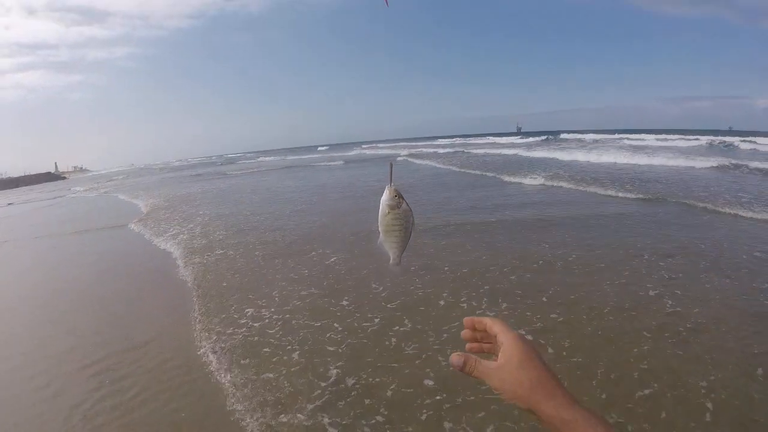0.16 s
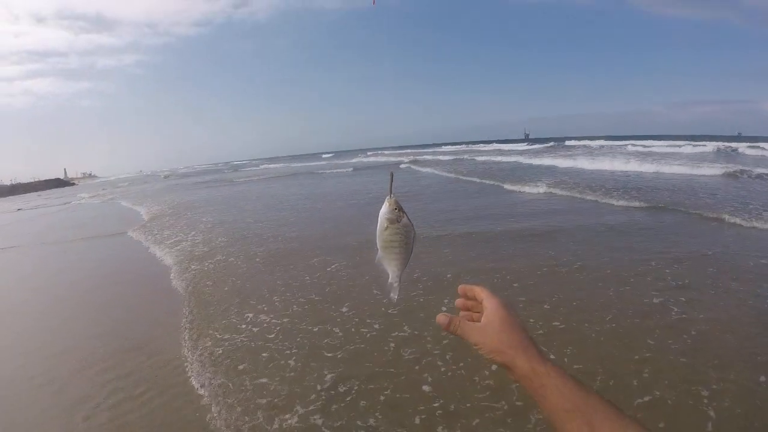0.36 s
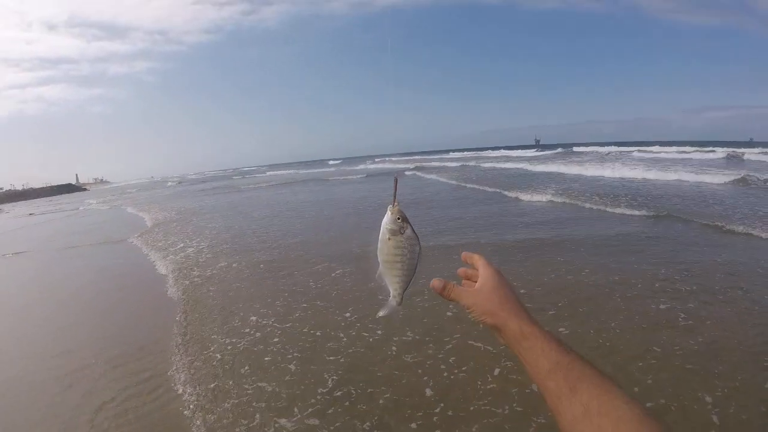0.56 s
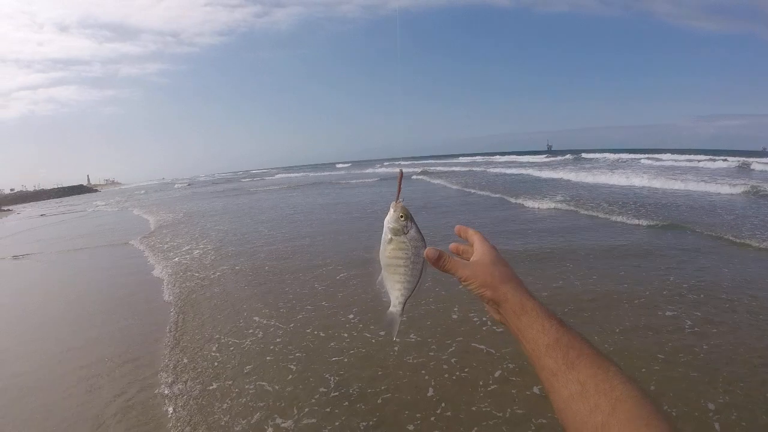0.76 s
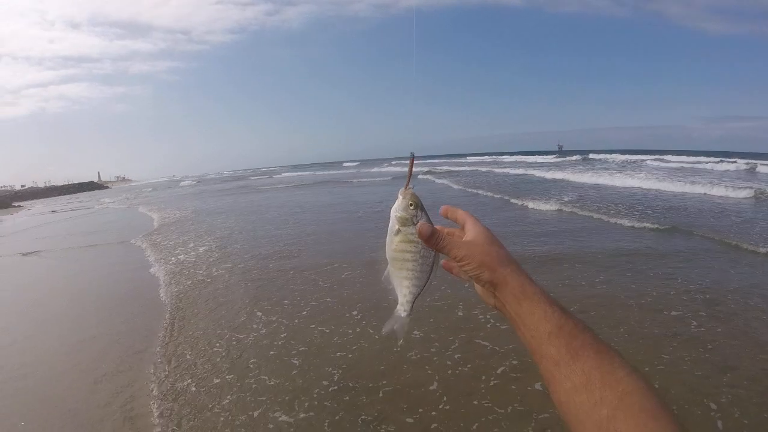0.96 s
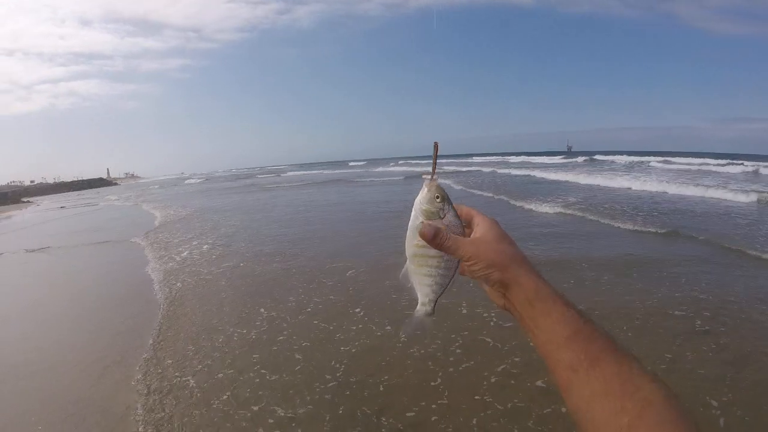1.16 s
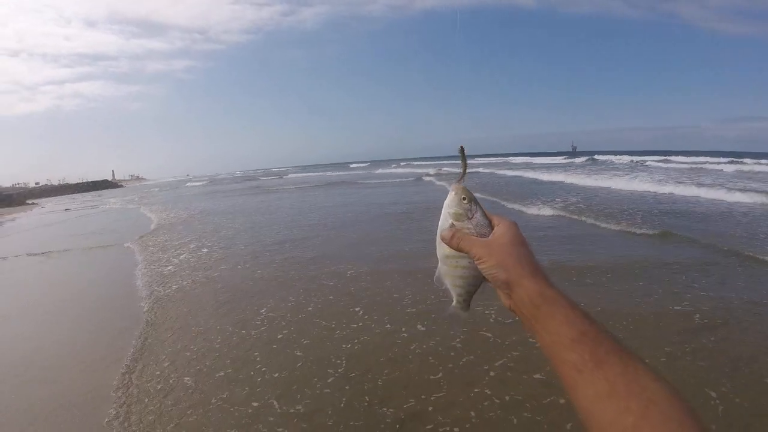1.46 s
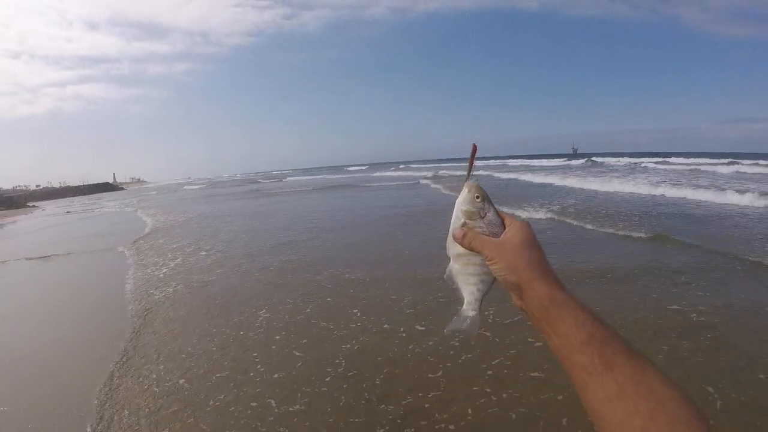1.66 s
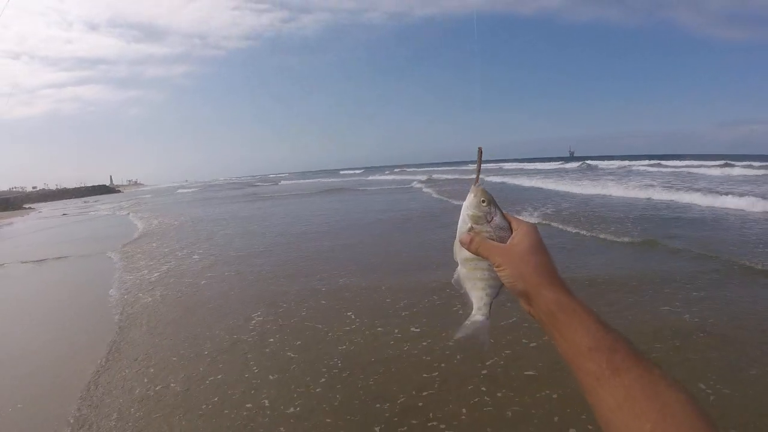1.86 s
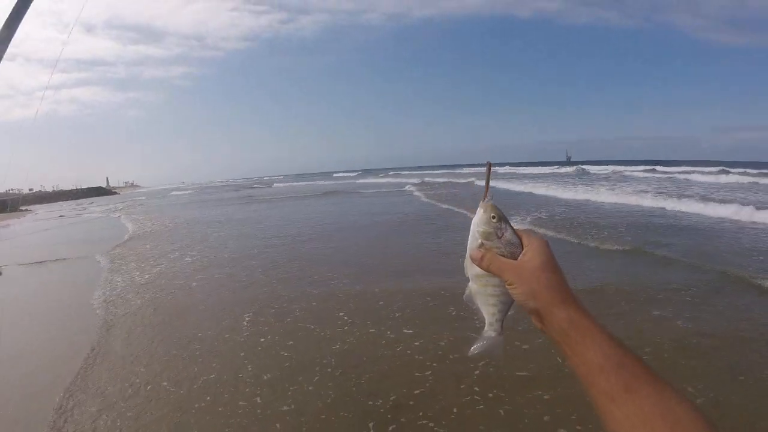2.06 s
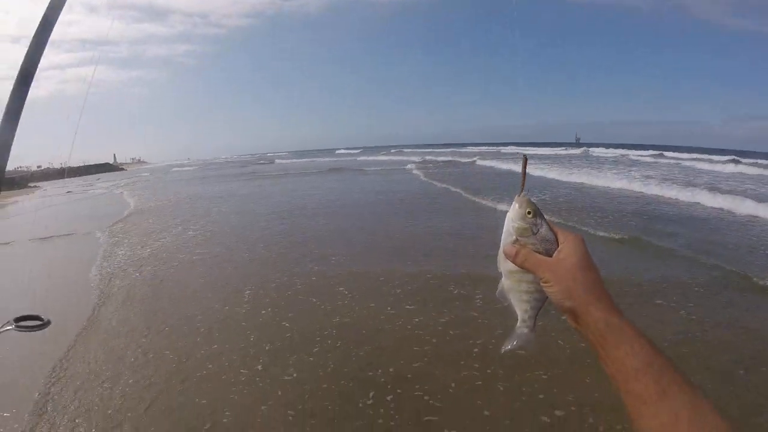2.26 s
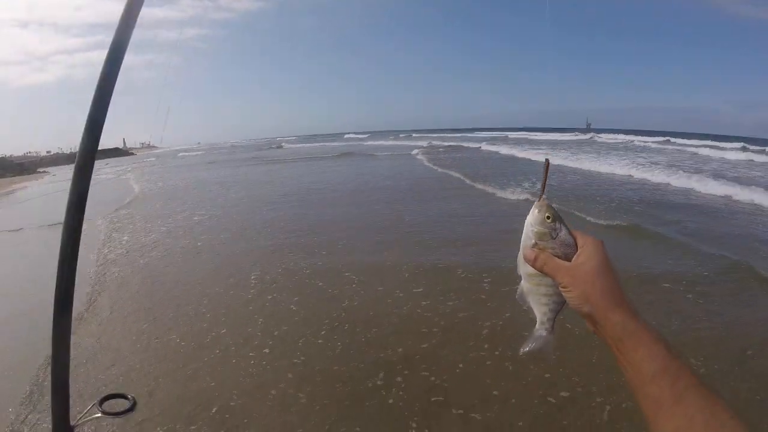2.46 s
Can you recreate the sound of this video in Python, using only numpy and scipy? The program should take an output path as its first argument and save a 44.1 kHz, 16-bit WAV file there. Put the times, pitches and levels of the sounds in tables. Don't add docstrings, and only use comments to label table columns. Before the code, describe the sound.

Strong wind buffeting and thumping on a small microphone, with surf hissing softly on a sandy beach behind

```python
import sys
import numpy as np
from scipy import signal
from scipy.fft import rfft
from scipy.io import wavfile
from scipy.ndimage import uniform_filter1d, minimum_filter1d

SR = 44100
rng = np.random.default_rng(int(sys.argv[2]) if len(sys.argv) > 2 else 0)


def rack_gain(trim_db):
    fader = np.asarray(trim_db, float)
    return 10 ** (fader / 20)


def transcribe(u):
    v = np.clip(np.atleast_2d(u).T, -1, 1)
    q = np.round(v * 32767).astype(np.int16)
    wavfile.write(sys.argv[1], SR, q)


N = 114660

# time in seconds, level in dB.
FOAM_RUSH = [
    (0, -38.5),
    (.15, -37.5),
    (.45, -35.5),
    (.8, -34),
    (1.0, -38.5),
    (1.23, -37.5),
    (1.45, -40),
    (2.2, -41),
    (2.5, -39),
    (2.6, -40.5),
]
# frequency in Hz, density in dB per Hz.
FOAM_COLOUR = [(60, -0.5), (300, -1.5), (880, -8), (2550, -16.5), (3300, -21), (6000, -28.5), (10000, -40),
               (15000, -45)]
# frequency in Hz, gain in dB.
HOUSING = [(3400, 0), (4300, -2), (5000, 4.5), (5800, 4.5), (6600, -3), (10500, 0), (11600, -13),
           (12700, -13)]
# frequency in Hz, gain in dB.
HOUSING_AIR = [(12700, 0), (13600, 4.5), (14200, -2), (15000, -6)]
# time in seconds, level in dB.
STEADY_WIND = [(0, -24), (.3, -22.5), (.75, -17.5), (.87, -27), (1.19, -20.5), (1.5, -18), (1.78, -20),
               (1.95, -16.5), (2.13, -25), (2.3, -24.5), (2.42, -20.5), (2.5, -18), (2.57, -20), (2.6, -31)]
# frequency in Hz, density in dB per Hz.
EDDY_COLOUR = [(14, -7.5), (25, 2), (60, 1), (120, -7), (250, -20.5), (500, -32.5), (1000, -49),
               (2000, -60.5)]
# centre in seconds, strength in dB, half length in seconds.
SLOW_PUFFS = [(.068, -12.5, 0.016), (.126, -9.5, .016), (.236, -14, 0.023), (.325, -13.5, .019),
              (.399, -15, 0.018), (.474, -15, 0.012), (.57, -15, 0.023), (.613, -12.5, .016),
              (.653, -18.5, 0.017), (.712, -10, .022), (.782, -7.5, 0.016), (.82, -8.5, 0.015),
              (.908, -10, 0.022), (.982, -7.5, 0.015), (1.025, -11.5, 0.021), (1.103, -14, 0.015),
              (1.15, -16, 0.021), (1.25, -12, 0.023), (1.298, -8.5, 0.023), (1.411, -9, .013),
              (1.46, -7, 0.012), (1.495, -7.5, 0.025), (1.612, -9, 0.029), (1.72, -13, 0.039),
              (1.85, -9, 0.023), (1.94, -9, 0.036), (2.095, -6.5, 0.011), (2.272, -9, 0.013),
              (2.501, -7.5, .016), (2.555, -8.5, 0.028)]
# centre in seconds, strength in dB, half length in seconds.
QUICK_BUFFETS = [(0.13, -25, 0.01), (.306, -22.5, 0.0094), (.711, -23, 0.0075), (0.768, -20.5, 0.013),
                 (.818, -13, 0.013), (.913, -13, 0.015), (.992, -11, 0.01), (1.074, -20, 0.018),
                 (1.103, -19, .008), (1.243, -16, 0.02), (1.322, -14, 0.011), (1.361, -20, 0.014),
                 (1.41, -16.5, 0.013), (1.519, -16, 0.013), (1.545, -17.5, 0.0099), (1.583, -19, 0.012),
                 (1.615, -14.5, 0.0094), (1.692, -19, 0.011), (1.718, -15.5, 0.011), (1.752, -18, 0.011),
                 (1.815, -20, 0.016), (1.886, -20, 0.017), (1.942, -16.5, 0.015), (1.992, -15, 0.012),
                 (2.035, -12.5, .01), (2.097, -17, 0.011), (2.243, -20, 0.011), (2.272, -16, 0.0083),
                 (2.468, -17.5, 0.017), (2.572, -17.5, .016)]
# centre in seconds, level in dB, frequency in Hz.
PRESSURE_EDGES = [(.126, -22, 600), (.589, -23, 650), (.745, -23, 600), (.918, -25, 600), (.993, -18, 600),
                  (1.263, -26, 600), (1.299, -25, 600), (1.402, -21, 650), (1.419, -23, 650),
                  (1.516, -22, 800), (1.603, -18, 806), (1.665, -24, 700), (1.732, -17.5, 845),
                  (1.925, -23, 600), (1.94, -18.5, 1010), (1.989, -22, 700), (2.015, -23, 800),
                  (2.036, -27, 700), (2.473, -25, 700), (2.573, -22, 700)]
# start in seconds, level in dB, frequency in Hz, 60 dB decay time in seconds.
DROPLET = [
    (.482, -42, 10200, .008),
    (.482, -52, 13200, .006),
]


def curve(table):
    return np.interp(np.arange(N) / SR, *np.array(table).T)


def colour(table, hz):
    table_hz, db = np.array(table).T
    return np.interp(np.log(hz), np.log(table_hz), db)


def walk(rate):
    hold = int(SR / rate)
    steps = np.repeat(rng.standard_normal(N // hold + 1), hold)
    return 1.3 * uniform_filter1d(uniform_filter1d(steps, hold), hold)[:N]


def bands(shade, low_hz, count):
    f = np.maximum(np.fft.rfftfreq(N, 1 / SR), 1)
    spectrum = rfft(rng.standard_normal(N)) * rack_gain(shade(f))
    for hz in low_hz * 2 ** (np.arange(count) / 2):
        window = np.cos(np.pi / 2 * np.clip(2 * np.log2(f / hz), -1, 1)) ** 2
        yield hz, np.fft.ifft(2 * spectrum * window, N)


def bumps(table, spread):
    t = np.arange(N) / SR
    return sum(rack_gain(db) * np.exp(-((t - s) / (spread * length)) ** 2) for s, db, length in table)


def surf():
    foam_db, flicker_db = 9.5, 0.37
    tilt = -0.08
    rush = curve(FOAM_RUSH)
    rush_mean = rush.mean()

    def shade(f):
        return colour(FOAM_COLOUR, f) + colour(HOUSING, f) + colour(HOUSING_AIR, f)

    foam, steady = 0, 0
    for hz, band in bands(shade, 64, count=17):
        lift = (rush - rush_mean) * (1 + tilt * np.log2(hz / 3000))
        flicker = flicker_db * (walk(8.99) + 0.5 * walk(3))
        foam = foam + band.real * rack_gain(lift + flicker)
        steady = steady + band.real
    return foam / steady.std() * rack_gain(rush_mean + foam_db)


def wind():
    wind_db, flicker_db = 0.42, 1.5
    evenness = 0.69
    puff_db, puff_hz = -3, 130
    buffet_db, buffet_hz = 11, 149
    edge_db, edge_hz = 5, 415
    rumble = rack_gain(curve(STEADY_WIND) + flicker_db * walk(20))
    puff = bumps(SLOW_PUFFS, 0.91)
    buffet = bumps(QUICK_BUFFETS, 1.37)
    edge = bumps(QUICK_BUFFETS, 0.62)
    gusts, steady = 0, 0
    for hz, band in bands(lambda f: colour(EDDY_COLOUR, f), 16.08, count=15):
        swell = np.abs(band)
        mean = swell.mean()
        band = (band * (mean / (swell + 0.28 * mean)) ** evenness).real
        large = 1 / (1 + (hz / puff_hz) ** 2)
        small = 1 / (1 + (buffet_hz / hz) ** 2)
        tiny = 1 / (1 + (edge_hz / hz) ** 4)
        slow = rack_gain(puff_db) * large * puff
        quick = rack_gain(buffet_db) * (small * (1 - tiny) * buffet + rack_gain(edge_db) * tiny * edge)
        gusts = gusts + band * (rumble + slow + quick)
        steady = steady + band
    return gusts / steady.std() * rack_gain(wind_db)


def snaps():
    t, out = np.arange(N) / SR, 0
    for s, db, hz in PRESSURE_EDGES:
        cycles = (t - s) * hz
        bell = np.exp(-(cycles / 0.7) ** 2)
        out = out + rack_gain(db + 5) * np.sin(1.7 * np.pi * cycles) * bell
    return out


def thumps():
    thump_db, thump_hz, scatter = -1, 180.9, 0.2
    t, out = np.arange(N) / SR, 0
    draws = rng.uniform(-1.06, 1, (len(QUICK_BUFFETS), 2))
    for (s, db, length), (pitch, phase) in zip(QUICK_BUFFETS, draws):
        x = t - s
        hz = thump_hz * np.exp(scatter * pitch)
        bell = np.exp(-(x / length) ** 2)
        push = np.sin(2 * np.pi * hz * x * (1 + 12 * x) + np.pi * phase)
        out = out + rack_gain(db + thump_db) * bell * push
    return out


def ticks():
    t, out = np.arange(N) / SR, 0
    for s, db, hz, t60 in DROPLET:
        x = np.maximum(t - s, 0)
        attack = 1 - np.exp(-x / 0.0003)
        decay = np.exp(-np.log(1000) * x / t60)
        out = out + rack_gain(db) * np.sin(2 * np.pi * hz * x) * decay * attack
    return out


def scene():
    mix = surf() + wind() + snaps() + thumps() + ticks()
    return mix[None]


def band_limit(x):
    return signal.sosfilt(signal.butter(12, 15020, fs=SR, output="sos"), x)


def record(dry):
    ceiling, fade_s = 2.3, 0.004
    t = np.arange(N) / SR
    peak = -minimum_filter1d(-np.abs(dry), size=257, axis=1)
    gain = uniform_filter1d(1 / np.sqrt(1 + (peak / ceiling) ** 2), size=257, axis=1)
    fade = np.sin(np.pi / 2 * np.clip(t / fade_s, 0, 1))
    return band_limit(dry * gain * fade)


dry = scene()
out = record(dry)
transcribe(out)
```